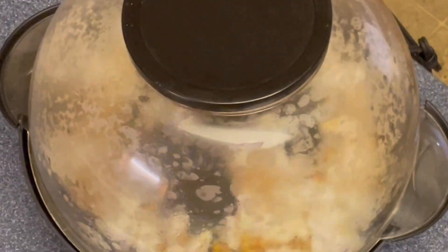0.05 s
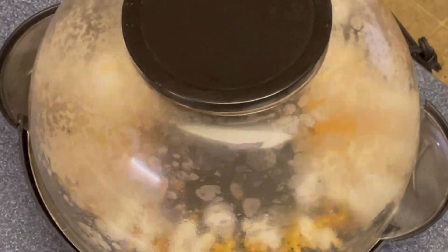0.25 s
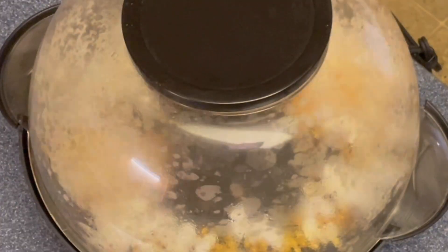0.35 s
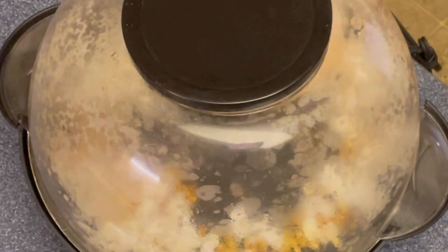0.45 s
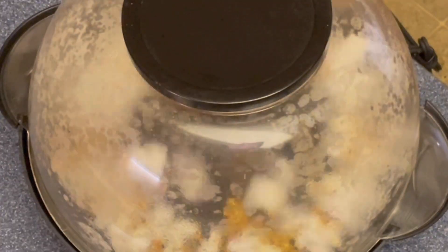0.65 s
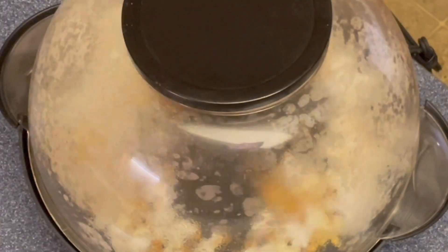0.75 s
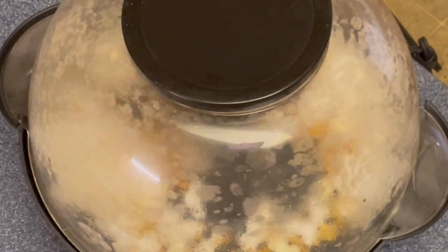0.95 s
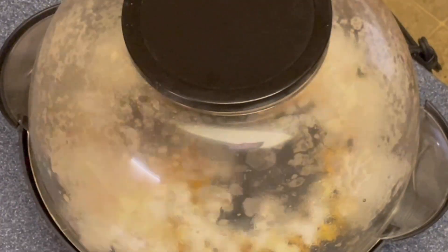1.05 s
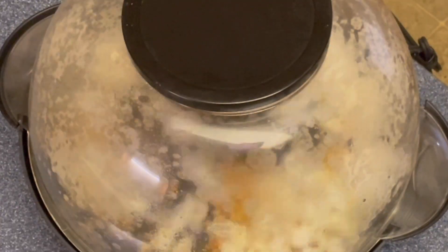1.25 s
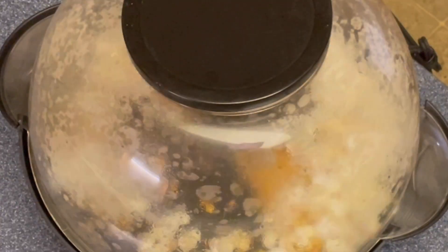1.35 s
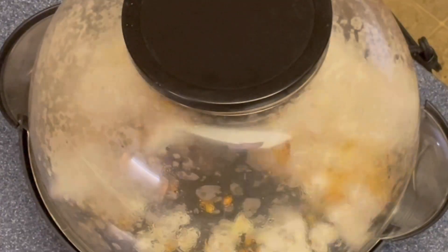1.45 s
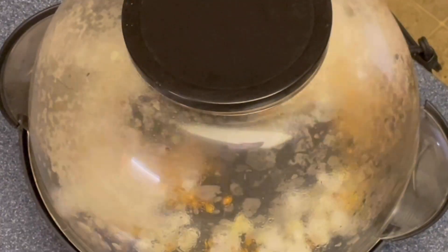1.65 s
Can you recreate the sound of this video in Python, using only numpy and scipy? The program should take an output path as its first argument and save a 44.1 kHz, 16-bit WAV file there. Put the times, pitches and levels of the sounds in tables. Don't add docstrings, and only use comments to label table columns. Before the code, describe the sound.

Popcorn pops under a plastic dome, close, in a lightly reverberant kitchen. Quiet grainy stirring and motor rumble with faint sizzle runs throughout. A loud hollow pop at 0.2 s scatters kernels brightly over the metal pan; a sharp crack follows at 0.43, then pops and rattles from 0.55 to 0.85. After a lull, pops cluster at 1.1 to 1.4 s, ending in small ticks and pings until about 1.63.

```python
import sys
import numpy as np
from scipy import signal
from scipy.fft import rfft, irfft
from scipy.io import wavfile
from scipy.ndimage import uniform_filter1d

SR = 44100
rng = np.random.default_rng(int(sys.argv[2]) if len(sys.argv) > 2 else 0)


def unload_audio(sound):
    columns = np.transpose(np.atleast_2d(sound))
    steps = np.round(np.clip(columns, -1, 1) * 32767)
    wavfile.write(sys.argv[1], SR, steps.astype(np.int16))


def magnitude_from_level(level_db):
    exponent = np.asarray(level_db, float) / 20
    return 10 ** exponent


N = 74970
TAIL_EDGE_HZ = 13860

# (time [s], level [dB], starting pitch [Hz], ring level [dB])
BURST_THUMPS = [(.2136, -15, 903, -6.5), (.394, -35, 1220, -32), (.430, -38, 660, 3),
                (.442, -36.5, 640, -17), (.552, -24.5, 686, -3.5), (.608, -41.5, 1140, -19),
                (.6245, -27, 1070, -6.5), (.646, -31, 560, -9), (.823, -32, 790, -13),
                (1.104, -40.5, 644, -0.5), (1.1195, -28.5, 664, -2.5), (1.227, -29.5, 595, -4),
                (1.258, -36, 706, 1.5), (1.3785, -25.5, 586, -6.5)]
# (time [s], level [dB], ring level [dB], tilt [dB per octave])
SHELL_TICKS = [(.213, -24, 11, -7), (.4285, -10.5, 0.5, -4), (.551, -20, -4.5, -5.5), (.637, -41, 0, 4),
               (.645, -23, 4, -6), (.822, -18.5, -10, -6), (1.102, -20, -4, -4.5),
               (1.1185, -18.5, 1.5, -4.5), (1.226, -25, 0.5, -8), (1.2446, -48, 4, -1),
               (1.257, -18, -6.5, -9), (1.3825, -25.5, 8, 2), (1.477, -33, 1.5, -10), (1.6288, -35, -6, -2)]
# (time [s], level [dB], loudest spot [Hz], t60 [s], hiss level [dB])
PAN_SHOWERS = [(0, -40, 2510, 0.11, 0), (.028, -46.5, 2870, 0.13, 5.5), (.2195, -12.5, 3200, 0.083, 3.5),
               (.2245, -19, 2840, 0.1, 0.5), (.242, -31, 3500, 0.22, 6), (.257, -35, 2640, 0.23, 9.5),
               (.3204, -43, 3030, 0.29, 10), (.3364, -41, 3010, 0.19, 2.5), (.469, -24.5, 3020, 0.028, -11),
               (.5765, -43, 2520, 0.12, -23), (.6075, -32.5, 2950, 0.1, -5), (.655, -18.5, 3330, 0.053, -2),
               (.6605, -23.5, 3180, 0.11, -0.5), (.6945, -26.5, 3200, 0.062, 1.5),
               (.7107, -31, 3260, 0.16, -7), (.851, -33, 3240, 0.048, -13), (1.2439, -37, 2990, 0.2, 7),
               (1.283, -18, 3180, 0.038, 4), (1.2895, -38, 3130, 0.039, 9), (1.302, -33, 3400, 0.17, 3),
               (1.3817, -30.5, 2890, 0.26, 6), (1.413, -36, 2580, 0.14, -17), (1.419, -36, 2904, 0.035, 10),
               (1.629, -39, 2840, 0.038, -6.5)]
# (time [s], level [dB], pitch
# [Hz], t60 [s])
SOFT_PINGS = [(.2199, -15.5, 3060, 0.026), (.2221, -18, 7300, 0.018), (.2250, -19, 7330, 0.019),
              (.2250, -38, 2900, 0.026), (.2735, -39, 7400, .03), (.2755, -31.5, 3000, 0.044),
              (.3200, -38, 8000, .03), (.3357, -36, 7740, .04), (.3380, -38, 5070, 0.033),
              (.3935, -44, 2500, 0.073), (.5750, -43, 2510, 0.062), (.5760, -37, 2920, 0.03),
              (.5815, -40, 1150, 0.088), (.6110, -31, 2995, 0.032), (.6195, -38, 3100, 0.043),
              (.6370, -33, 6860, .03), (.6455, -42, 5060, 0.045), (.6455, -41, 6400, 0.049),
              (1.1030, -45, 2190, 0.057), (1.1035, -44, 6480, 0.047), (1.1065, -46.5, 3980, 0.09),
              (1.1190, -42.5, 2160, 0.099), (1.1190, -39, 6330, 0.071), (1.1330, -44, 2120, .08),
              (1.3810, -32, 2950, 0.04), (1.4120, -29, 2540, 0.078), (1.4150, -29.5, 2910, 0.066),
              (1.4160, -44, 1150, 0.16), (1.4360, -33, 3200, 0.032), (1.4760, -38, 6100, 0.024),
              (1.5305, -44, 8150, 0.023), (1.5785, -48, 7980, 0.023), (1.6290, -40, 2860, .04),
              (1.6290, -43.5, 7630, 0.022), (.2141, -14.5, 966, 0.02), (.2160, -30.5, 353, 0.047),
              (.5530, -32.5, 390, 0.024), (.6560, -23, 3250, 0.036), (.6960, -27, 3286, 0.035),
              (1.1570, -49, 3000, 0.054), (1.1650, -48, 3350, .04), (1.2590, -39.5, 520, 0.054),
              (1.2600, -40.5, 281, 0.18), (1.2875, -23, 3310, .025), (1.3795, -30.5, 518, 0.054),
              (1.4000, -41, 1010, .03), (1.4190, -41.5, 523, 0.064), (.8520, -41.5, 4120, 0.029),
              (.0285, -42, 7200, 0.026)]
# (frequency [Hz], level [dB], t60 [s])
DOME_MODES = [(285, -4.5, 0.17), (505.3, 12, 0.082), (625, -1, 0.022), (866, -17, 0.093), (1090, 13, 0.028),
              (1532, -8, 0.25)]
# (frequency [Hz], level [dB], t60 [s])
SHELL_MODES = [(2084, -12.5, 0.056), (2954, -19, 0.059), (4057, -11, 0.21), (5223, 0, 0.083),
               (6400, 3, 0.017), (6890, -2, 0.057), (8140, 3.5, 0.026), (9100, -1, 0.059),
               (9860, 4.5, 0.033), (11180, 2.5, 0.11)]
# (frequency [Hz], level [dB], t60 [s])
PAN_MODES = [(2593, -8, 0.13), (2840, -26, 0.027), (2953, 2, 0.06), (3100, -41, 0.058), (3200, 1, 0.034),
             (3585, -9, 0.23), (4030, -12, 0.25), (4340, -32, .06), (4370, -16, 0.13), (4990, -4.5, 0.086),
             (5400, -26, 0.077), (5800, -1, 0.074), (7080, 1, 0.017), (7300, 2, 0.024)]
# (frequency [Hz], level [dB per Hz])
CRACK_COLOUR = [(400, -23.5), (1300, -21.5), (2100, -5), (5200, -3.5), (9600, 3.5), (15600, 12),
                (16500, -32)]
# (frequency [Hz], level [dB per Hz])
CLATTER_COLOUR = [(1500, -21), (2300, -16), (2900, 1), (7400, -2.5), (10500, -8), (13300, -15),
                  (14200, -11), (16500, -74)]
# (frequency [Hz], level [dB per Hz])
RUMBLE_COLOUR = [(40, -35), (170, -1.5), (370, -12), (500, 4), (1180, -7), (1400, -3.5), (3700, -14.5),
                 (8400, -17), (14000, -33.5)]
# (frequency [Hz], width [Hz], level [dB])
HOUSING_HUMPS = [(297, 11, -21), (703, 30, -30.5), (954, 160, -6), (1135, 44, -7.5), (1540, 7, -19.5),
                 (2740, 55, -19.5)]
# (frequency [Hz], likeness [0 to 1])
EAR_LIKENESS = [(60, 0.93), (240, 0.91), (950, 0.7), (3770, 0.12), (15000, 0.15)]
# (frequency [Hz], left minus right [dB])
LEFT_LEAN = [(60, 4), (240, 4), (950, 5), (3770, 1), (15000, 2.5)]
# (frequency [Hz], t60 [s])
ROOM_DECAY = [(200, 0.25), (1000, 0.41), (4000, 0.34), (12000, 0.19)]


def thump(s, db, top_hz, ring_db):
    t = np.arange(0, .25, 1 / SR)
    sag, drop_s = 0.82, 0.0023
    hz = top_hz * (sag + (1 - sag) * np.exp(-(t / drop_s) ** 2))
    swell = t * top_hz / 1.33
    envelope = swell ** 3 * np.exp(1.5 - 1.54 * swell ** 2)
    pulse = envelope * np.sin(2 * np.pi * np.cumsum(hz) / SR + 1.59)
    push_db, push_s = -20, 0.0022
    push = t / push_s
    pulse = pulse + magnitude_from_level(push_db) * push * (2 - push) * np.exp(1 - push)
    mode_hz = np.transpose(DOME_MODES)[0][:, None]
    more_db = 1.8 * np.log2(top_hz / 900) * np.log2(mode_hz / 600)
    body = ring(DOME_MODES, .25, 0.14, more_db) * (1 - np.exp(-(t / 0.0024) ** 2))
    rattle_band = signal.butter(2, [220, 800], "band", fs=SR, output="sos")
    rattle = evened(signal.sosfilt(rattle_band, pair(len(t), 0.94)))
    rattle_db, rattle_t60 = -13, 0.085
    rattle = rattle * magnitude_from_level(rattle_db - 60 * t / rattle_t60) * np.minimum(t / 0.0011, 1)
    return s, magnitude_from_level(db) * (pulse + magnitude_from_level(ring_db) * body / abs(body).max() + rattle)


def tick(s, db, ring_db, tilt_db):
    t = np.arange(0, .25, 1 / SR)
    noise = evened(colour(pair(len(t), 0.19), CRACK_COLOUR, tilt_db))
    snap = magnitude_from_level(2.0 - 60 * t / 0.0084) * noise
    spray = magnitude_from_level(-15 - 60 * t / 0.19) * dull(noise, 14530)
    crack = np.minimum(t / 0.0004, 1) * (snap + spray)
    hz = np.transpose(SHELL_MODES)[0][:, None]
    split, beat_db = 0.0151, 3.5
    more_db = tilt_db * np.log2(hz / 5000) + beat_db * np.cos(2 * np.pi * split * hz * t)
    modes = np.minimum(t / 0.00083, 1) * ring(SHELL_MODES, .25, 1.5, more_db)
    return s, magnitude_from_level(db - 9) * (crack + magnitude_from_level(ring_db - 10.5) * modes)


def shower(s, db, spot_hz, t60, hiss_db):
    t = np.arange(0, .4, 1 / SR)
    fall = np.minimum(t / 0.0017, 1) * magnitude_from_level(-60 * t / max(t60, .01))
    struck = rng.random(len(t)) < 2200 / SR
    force = magnitude_from_level(3.4 * np.minimum(rng.exponential(1, len(t)), 3))
    knocks = struck * force * rng.choice([-1, 1], len(t))
    knocks[[30, 70]] = 0.92
    strikes = (knocks * fall)[None]
    far_db, near_octaves = -7.5, .12
    modes = PAN_MODES + [(spot_hz, 3.5, .035), (spot_hz * 1.04, 1.5, .025)]
    octaves = np.abs(np.log2(np.transpose(modes)[0] / spot_hz))
    near_db = far_db * np.tanh(octaves / near_octaves)[:, None]
    pan = signal.fftconvolve(ring(modes, 0.11, 0.73, near_db), strikes, axes=1)[:, :len(t)]
    pan = signal.sosfilt(signal.butter(3, 2120, "high", fs=SR, output="sos"), pan)
    knock_ring = magnitude_from_level(-.4 * (db + 16.5)) * ring([(1150, -15.5, 0.077)], .1, 1.0)
    housing = signal.fftconvolve(knock_ring, strikes, axes=1)[:, :len(t)]
    lumps = evened(2.6 + uniform_filter1d(abs(knocks), 60) * 12)
    clatter = evened(colour(pair(len(t), 0.037), CLATTER_COLOUR))
    hiss = dull(clatter, TAIL_EDGE_HZ + 300) * lumps * fall
    pan_rms = np.sqrt((pan ** 2).sum() / (fall ** 2).sum() / 2)
    return s, magnitude_from_level(db - 7.5) * ((pan + housing) / pan_rms + magnitude_from_level(hiss_db) * hiss)


def ping(s, db, hz, t60):
    t = np.arange(0, .2, 1 / SR)
    turn = 2 * np.pi * hz * t + np.array([[0], [0.000042 * hz]])
    envelope = magnitude_from_level(db - 60 * t / t60) * (1 - np.exp(-(t / 0.0019) ** 2))
    return s, envelope * (np.sin(turn) + magnitude_from_level(-9) * np.sin(1.05 * turn))


def rumble():
    frames, hz = N // 128 + 8, np.fft.rfftfreq(512, 1 / SR)
    a, b, c, d, patch = rng.standard_normal((frames, 257, 5)).T
    patch = evened(uniform_filter1d(uniform_filter1d(patch, 8, 0), 10, 1))
    same = np.clip(read(EAR_LIKENESS, hz), 0, 1)[:, None]
    left = a + 1j * b
    right = same * left + np.sqrt(1 - same ** 2) * (c + 1j * d)
    z = np.array([left, right]) * magnitude_from_level(2.26 * patch)
    white = evened(signal.istft(z, nperseg=512, noverlap=384)[1][:, 256:N + 256])
    grains = magnitude_from_level(0.69 * np.minimum(rng.exponential(1, N // 64 + 1), 4))
    knocks = white * grains.repeat(64)[:N]
    body = evened(colour(white, RUMBLE_COLOUR))
    for f, width, db in HOUSING_HUMPS:
        hump = signal.filtfilt(*signal.iirpeak(f, f / width, SR), knocks)
        body = body + magnitude_from_level(db) * evened(hump)
    return magnitude_from_level(-51) * evened(body)


def room(x):
    taps = np.zeros((2, SR // 2))
    at = np.arange(120, SR // 2 - 20, 20)
    at = at + rng.integers(0, 20, (2, len(at)))
    np.put_along_axis(taps, at, rng.choice([-1., 1.], at.shape), 1)
    hz, t, z = signal.stft(taps, SR, nperseg=256)
    decay = magnitude_from_level(-60 * t / read(ROOM_DECAY, hz)[:, None])
    tail = signal.istft(z * decay, SR, nperseg=256)[1]
    return signal.fftconvolve(x, tail / np.linalg.norm(tail[0]), axes=1)[:, :N]


def ring(modes, seconds, spread, more_db=0):
    t = np.arange(0, seconds, 1 / SR)
    hz, db, t60 = np.transpose(modes)[:, :, None]
    luck = rng.standard_normal((3, len(modes), 1))
    phase = np.array([0 * luck[0], spread * luck[0]])
    level = magnitude_from_level(db + more_db + 1.5 * luck[1] - 60 * t / t60)
    detuned = hz * (1 + 0.0051 * luck[2])
    return (level * np.sin(2 * np.pi * detuned * t + phase)).sum(1)


def pair(size, same):
    a, b = rng.standard_normal((2, size))
    same = np.clip(same, 0, 1)
    return np.array([a, same * a + np.sqrt(1 - same ** 2) * b])


def colour(x, points, tilt_db=0):
    hz = np.fft.rfftfreq(x.shape[-1], 1 / SR)
    gain_db = read(points, hz) + tilt_db * np.log2((hz + 500) / 5000)
    return irfft(rfft(x) * magnitude_from_level(gain_db), x.shape[-1])


def dull(x, hz):
    return signal.sosfilt(signal.ellip(8, .5, 60, hz, fs=SR, output="sos"), x)


def evened(x):
    return x / np.sqrt(np.mean(x ** 2) + 1e-20)


def read(points, hz):
    f, value = np.transpose(points)
    return np.interp(np.log(hz + 1), np.log(f + 1), value)


def add(mix, s, sound):
    part = mix[:, round(s * SR):][:, :sound.shape[-1]]
    part += sound[..., :part.shape[-1]]


def scene():
    hits = np.zeros((2, N))
    layers = ((BURST_THUMPS, thump), (SHELL_TICKS, tick), (PAN_SHOWERS, shower), (SOFT_PINGS, ping))
    for rows, source in layers:
        for row in rows:
            add(hits, *source(*row))
    hits = signal.sosfilt(signal.butter(3, 151, "high", fs=SR, output="sos"), hits)
    reverb = magnitude_from_level(-10.5) * dull(room(hits), TAIL_EDGE_HZ)
    return hits + reverb + dull(rumble(), TAIL_EDGE_HZ + 600)


def band_limit(x):
    return signal.sosfilt(signal.butter(12, 16820, fs=SR, output="sos"), x)


def record(dry):
    hz = np.fft.rfftfreq(N, 1 / SR)
    half = np.array([[.5], [-.5]])
    lag = 1.18
    balance = magnitude_from_level(half * read(LEFT_LEAN, hz))
    delay = np.exp(2j * np.pi * half * lag * hz / SR)
    ports = irfft(rfft(dry) * balance * delay, N)
    return band_limit(dull(ports, 16100))


dry = scene()
out = record(dry)
unload_audio(out)
```